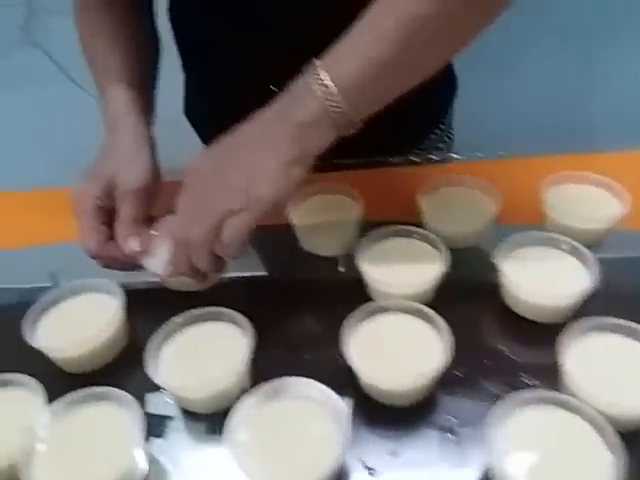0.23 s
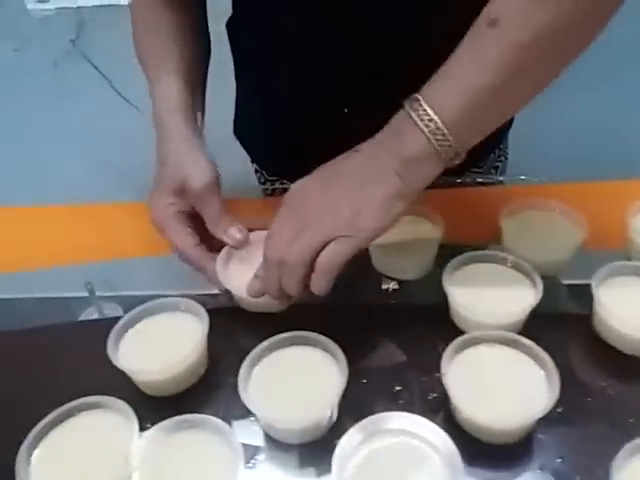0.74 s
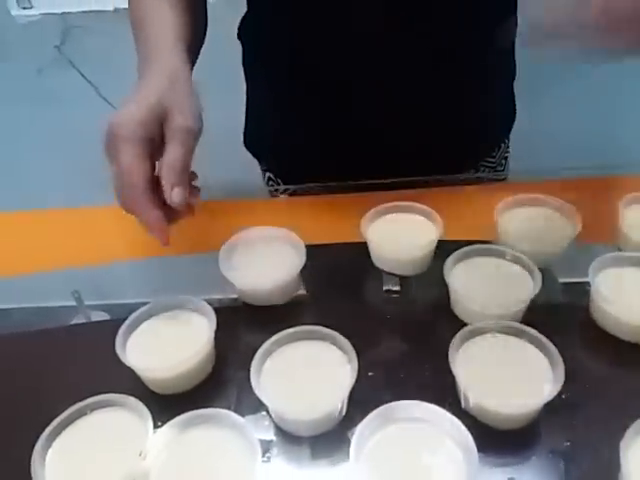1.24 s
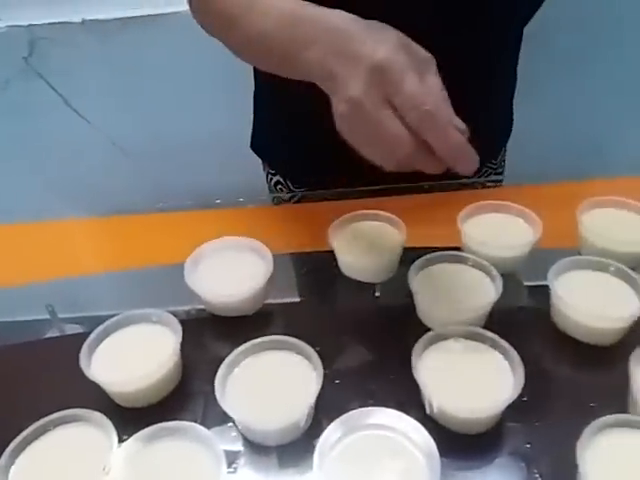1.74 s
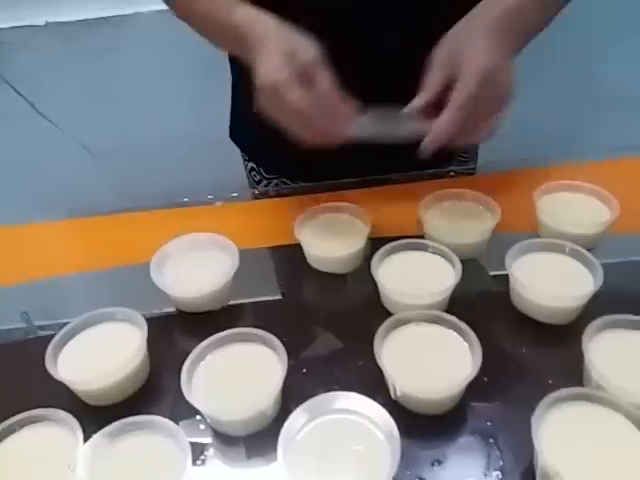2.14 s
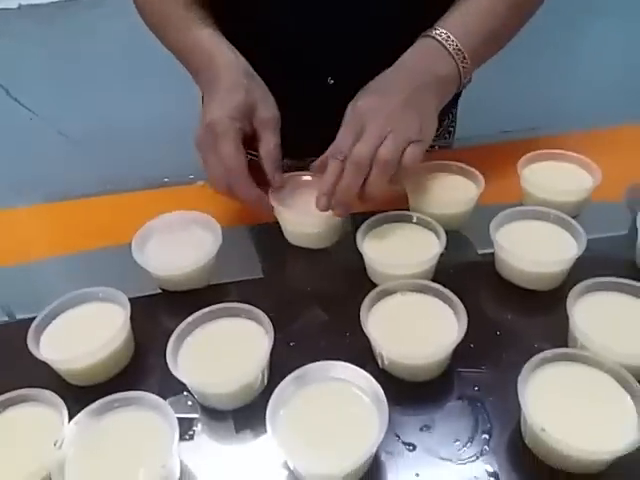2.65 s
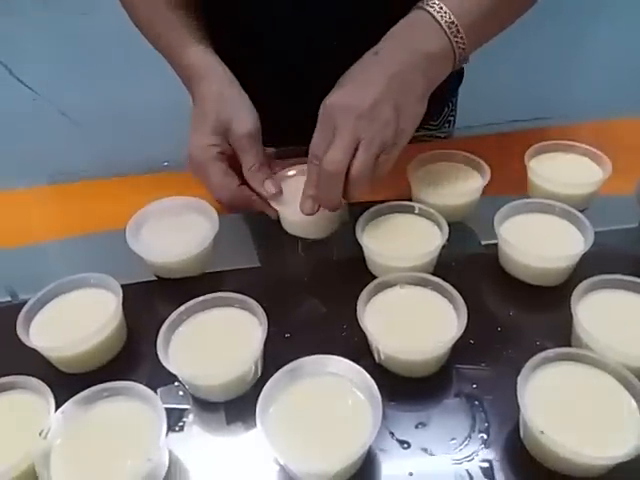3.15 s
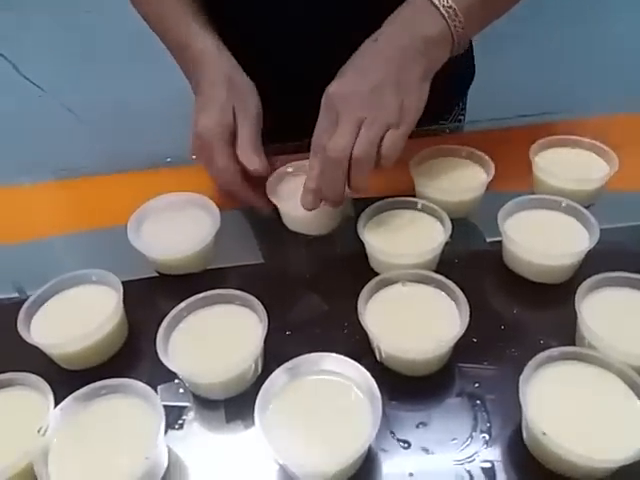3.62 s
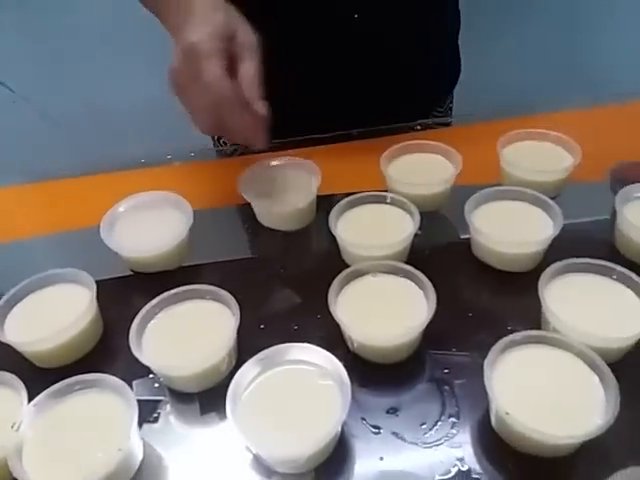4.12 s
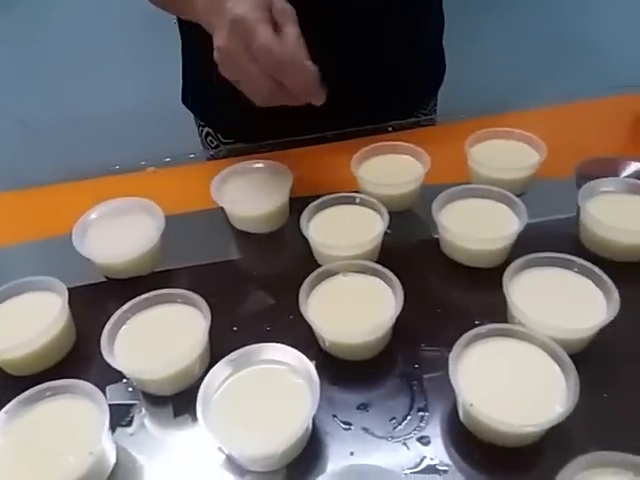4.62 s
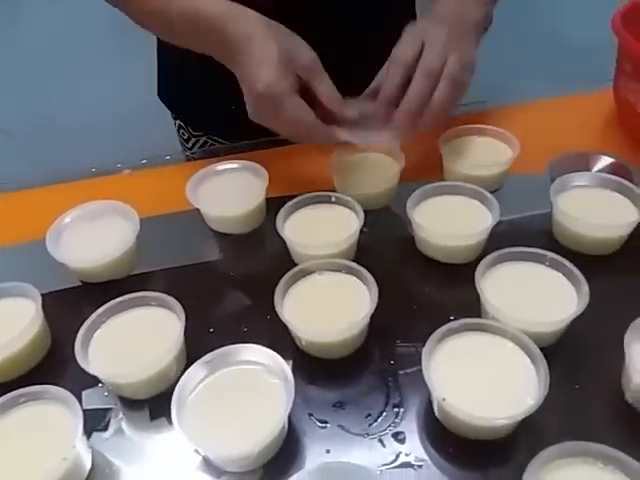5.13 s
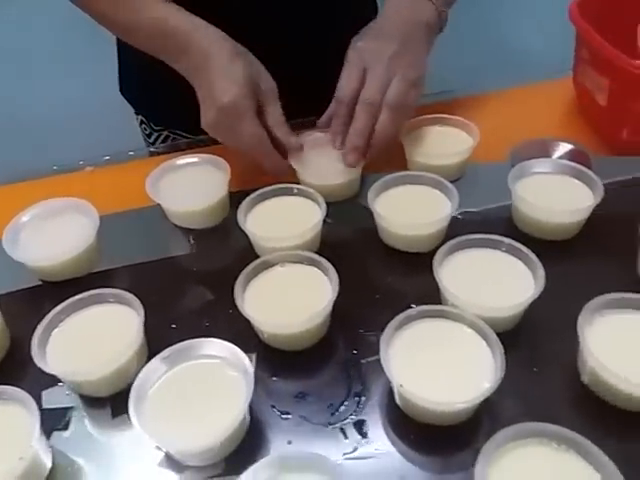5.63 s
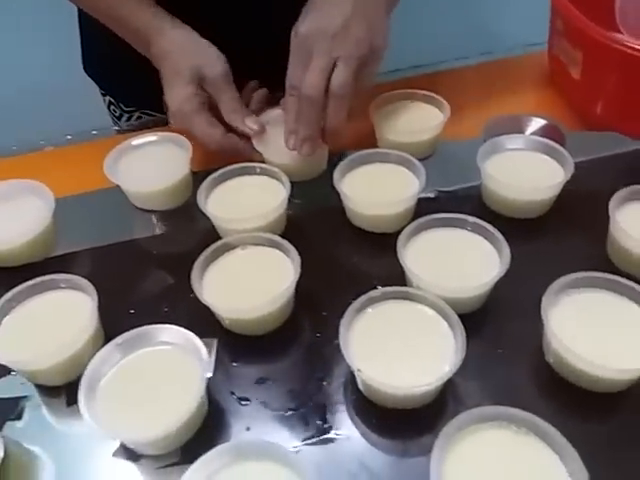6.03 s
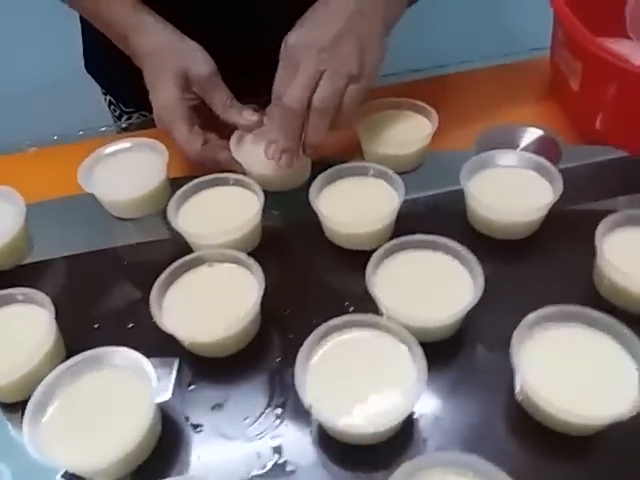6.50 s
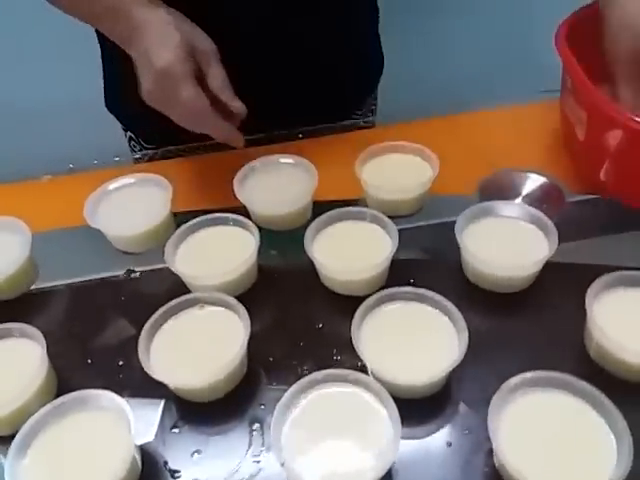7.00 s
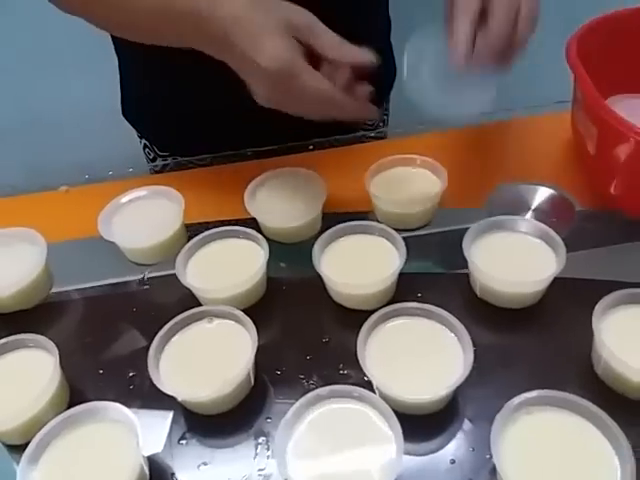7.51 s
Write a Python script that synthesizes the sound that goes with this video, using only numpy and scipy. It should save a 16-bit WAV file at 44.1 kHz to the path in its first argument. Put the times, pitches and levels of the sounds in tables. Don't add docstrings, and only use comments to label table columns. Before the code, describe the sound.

Sharp, short clicks of plastic lids seating on full cups ring with a roomy tail. Sparse snaps and tiny fingertip ticks alternate with knocking, rustling handfuls of loose lids. Late on, small presses lead to the loudest sound, a brief crackling crunch, then a snap and a brighter basket scrape with knocks. Soft house rumble and motor hum stay steady, heard through a muffled small microphone with little treble.

```python
import sys
import numpy as np
from scipy import signal
from scipy.fft import rfft, irfft
from scipy.io import wavfile

SR = 44100
rng = np.random.default_rng(int(sys.argv[2]) if len(sys.argv) > 2 else 0)


def decibels_to_gain(level_db):
    exponent = np.asarray(level_db, float) / 20
    return 10 ** exponent


def int16_out(signal):
    q = np.round(np.clip(np.atleast_2d(signal).T, -1, 1) * 32767)
    wavfile.write(sys.argv[1], SR, q.astype(np.int16))


N = 342118


def rms_one(x):
    return x / np.sqrt(np.mean(x ** 2) + 1e-20)


def peak_one(x):
    return x / np.abs(x).max()


def at_hz(points, hz):
    log_hz = np.log(np.array(points)[:, 0])
    return np.interp(np.log(hz + 1), log_hz, np.array(points)[:, 1])


def convolve(x, response):
    return signal.fftconvolve(x, response)[:len(x)]


def colour(x, points):
    size = 8192
    hz = np.arange(size // 2 + 1) * SR / size
    cepstrum = irfft(np.log(decibels_to_gain(at_hz(points, hz))))
    cepstrum[1:size // 2] *= 2
    cepstrum[size // 2 + 1:] = 0
    return convolve(x, irfft(np.exp(rfft(cepstrum))))


def drift(rate_hz):
    knot_hz = 40
    knots = rng.standard_normal(int(N / SR * knot_hz) + 2)
    r = np.exp(-2 * np.pi * rate_hz / knot_hz)
    slow = rms_one(signal.lfilter([1], [1, -r], knots))
    return np.interp(np.arange(N) / SR * knot_hz, np.arange(len(knots)), slow)


def ring(clicks, hz, t60_s):
    r, w = decibels_to_gain(-60 / (t60_s * SR)), 2 * np.pi * hz / SR
    return signal.lfilter([0, np.sin(w)], [1, -2 * r * np.cos(w), r * r], clicks + 1e-18)


def band(x, low_hz, high_hz):
    return signal.sosfilt(signal.butter(2, [low_hz, high_hz], "band", fs=SR, output="sos"), x)


def narrow_noise(hz, width_hz):
    noise = rng.standard_normal(N + SR)
    return rms_one(band(noise, hz - width_hz / 2, hz + width_hz / 2)[SR:])


# start_s [s], peak_db [dB], ring_hz [Hz], cup_db, crack_db [dB re peak]
SEATINGS = [(0.018, -24.5, 1420, -35, -41), (0.049, -10.5, 2360, -5, -20),
            (0.215, -12.5, 2040, -19.5, -32.5), (0.228, -15, 2670, -13.5, -27),
            (1.12, -17, 2310, -21, -25.5), (3.221, -7.5, 2340, -14, -21.5), (3.224, -16.5, 2410, -7, -17.5),
            (3.321, -9.5, 2430, -11.5, -9), (5.528, -20, 2000, -14, -36), (5.543, -25, 1610, -33, -33),
            (5.578, -31, 1680, -18, -29), (5.692, -26.5, 2280, -13, -33), (5.844, -30, 880, -19, -42),
            (5.859, -29.5, 920, -4, -34), (5.879, -33, 1980, -26, -22.5), (6.403, -27.5, 885, -5, -36),
            (6.769, -14.5, 2260, -10, -27)]
# start_s [s], peak_db [dB], ring_hz [Hz], crack_db [dB re peak], room_db [dB]
CRUNCH = [
    (6.414, -22, 2340, -22, -9),
    (6.419, -7, 2570, -28, -4),
    (6.424, -6, 2700, -24, 11),
    (6.435, -0.5, 1447, -20, -2),
    (6.45, -6, 1420, -26, -10),
    (6.465, -12.5, 1580, -17.5, 11),
    (6.485, -9, 1400, -33, -2.5),
    (6.528, -15, 2280, -24, -18),
]
# start_s [s], peak_db [dB],
# ring_hz [Hz], crack_db [dB re peak]
TICKS = [(0.748, -39, 2430, -29), (2.174, -36.5, 2450, -24.5), (2.471, -31.5, 2230, -32),
         (2.485, -29, 2250, -41), (2.918, -35, 2070, -32), (2.926, -33.5, 2320, -46),
         (2.934, -28.5, 2250, -30.5), (3.694, -33.5, 2420, -26.5), (3.764, -31.5, 2460, -32),
         (3.782, -37, 1760, -21), (5.373, -33, 2520, -34), (5.382, -29.5, 2500, -28),
         (5.503, -30, 2505, -43), (5.867, -26, 900, -18), (5.969, -27.5, 2500, -31),
         (6.249, -36.5, 2206, -28), (6.395, -34, 920, -37), (6.91, -48, 2310, -8), (6.919, -45, 1034, -22),
         (6.925, -39, 2000, -31)]
# start_s [s], peak_db [dB], crack_db [dB re peak], room_db [dB]
KNOCKS = [(1.695, -34, -25, -2), (1.708, -33, -27, 12), (1.778, -30, -28, 6.5), (4.235, -40.5, -26, 16),
          (4.263, -12.5, -26.5, 6), (4.307, -19, -18, 10), (4.475, -22.5, -23, 14.5), (4.495, -34, -32, 5),
          (4.503, -14.5, -21, -1.5), (4.593, -26, -16.5, 2.5), (4.677, -17, -13.5, 0.5),
          (4.69, -18.5, -38, 7.5), (4.701, -27, -38, 0), (4.814, -31.5, -12.5, 0), (4.86, -25, -24, 6.5),
          (4.932, -32.5, -23.5, 5), (5.03, -39, -37, 12), (7.142, -29.5, -22, 18),
          (7.151, -24.5, -32, 15.5), (7.167, -12.5, -23.5, 4.5), (7.181, -13.5, -21.5, -6),
          (7.185, -24, -26, -5), (7.191, -11.5, -29, 6), (7.202, -12, -31, -5), (7.236, -19.5, -31, 6),
          (7.322, -18.5, -25, 5.5), (7.344, -27, -15, 5), (7.381, -24.5, -18, 9), (7.459, -24.5, -16.5, 3),
          (7.481, -28, -21, -8)]
SEATING_ROOM_DB, TICK_ROOM_DB = 2.5, -1.5
CRUNCH_CUP_DB, TICK_CUP_DB, KNOCK_CUP_DB = -21.5, -20.5, -15.5


def contacts():
    seated = [(s, db, hz, cup, crack, SEATING_ROOM_DB, 0) for s, db, hz, cup, crack in SEATINGS]
    crunch = [(s, db, hz, CRUNCH_CUP_DB, crack, room, 0) for s, db, hz, crack, room in CRUNCH]
    ticks = [(s, db, hz, TICK_CUP_DB, crack, TICK_ROOM_DB, 0) for s, db, hz, crack in TICKS]
    starts, pitches = np.transpose(STROKES)[[0, 4]]
    knocks = [(s, db, pitches[np.searchsorted(starts, s) - 1], KNOCK_CUP_DB, crack, room, 1)
              for s, db, crack, room in KNOCKS]
    return seated + crunch + ticks + knocks


# pitch_hz [Hz], level_db [dB], t60_s [s]
CUP = [(204, -1.5, 0.016), (352, -4.5, 0.032), (592, -4.5, 0.032), (806, 1, 0.011), (1181, -2.5, 0.028),
       (1650, -3, 0.015)]
BASKET_HZ, BASKET_T60_S, BASKET_DB = 557, 0.067, -20.5


def cup_body(flurry, click, cup_db, loose):
    body = 0
    for k, (hz, db, t60_s) in enumerate(CUP):
        level_db = db + 3.4 * (rng.random() - .5)
        pitch_hz = hz * (1 + 0.29 * (rng.random() - .5))
        body = body + (-1) ** k * decibels_to_gain(level_db) * ring(flurry, pitch_hz, t60_s)
    cup = decibels_to_gain(cup_db + 4.5) * peak_one(band(body, 85, 3450))
    return cup + loose * decibels_to_gain(BASKET_DB) * ring(click, BASKET_HZ, BASKET_T60_S)


# pitch_hz [Hz], level_db [dB], t60_s [s]
BEAD = [(6000, -16.5, 0.0058), (7900, -3.5, 0.0045)]


def snaps():
    direct, send = np.zeros(N + 4096), np.zeros(N + 4096)
    t = np.arange(2048) / SR
    click = 1. * (t == 0)
    broad = peak_one(band(click, 1070, 2920))
    for start_s, peak_db, ring_hz, cup_db, crack_db, room_db, loose in contacts():
        height, chance, grain = rng.random((3, len(t)))
        flurry = click + (height - .5) * (chance < .1) * np.exp(-t / 0.0083) * 0.34
        rim = peak_one(band(ring(flurry, ring_hz, (20 + 22 * loose) / ring_hz), 440, 3400))
        rim = peak_one(rim + 0.07 * broad)
        cup = cup_body(flurry, click, cup_db, loose)
        top_hz = np.clip(16000 * decibels_to_gain(0.21 * (peak_db + 6) - 3.34 * loose), 4800, 16000)
        bead = (1 - loose) * sum(decibels_to_gain(db) * ring(flurry, hz, t60_s) for hz, db, t60_s in BEAD)
        crack = peak_one(band(0.76 * click + (grain - .5) * np.exp(-t / 0.0038), 2800, top_hz)) + bead
        spread = peak_one(band(ring(click, ring_hz, (12.2 + 7 * loose) / ring_hz), 600, 3050))
        spread = spread * (1.3 - 0.15 * loose) + (.7 - 0.18 * loose) * broad
        flat = peak_one(band(click, 3470, top_hz)) + 0.33 * bead
        at = round(start_s * SR)
        direct[at:at + len(t)] += decibels_to_gain(peak_db) * (rim + cup + decibels_to_gain(crack_db + 28) * crack)
        send[at:at + len(t)] += decibels_to_gain(peak_db + room_db) * (spread + cup + decibels_to_gain(crack_db + 35.5) * flat)
    return direct[:N], send[:N]


# pitch_hz [Hz], level_db [dB], t60_s [s]
LID = [(547, -1, 0.017), (880, -7, 0.019), (1200, -4, 0.021), (1420, -10, 0.022), (1840, 15, 0.01),
       (1982, 3.5, 0.015), (2250, 2.5, 0.0072), (2820, -22, 0.0086), (3120, 23, 0.0031)]
# start_s [s], length_s [s], crackle_db [dB], hiss_db [dB], loudest pitch_hz [Hz]
STROKES = [
    (1.677, 0.31, -50, -53.5, 2600),
    (4.251, 0.24, -36.5, -45, 2540),
    (4.472, 0.21, -39.5, -41, 2540),
    (4.662, 0.12, -32, -41, 2140),
    (5.52, 0.054, -45.5, -57, 1940),
    (5.842, 0.084, -41, -47, 2170),
    (6.396, 0.22, -45, -31, 2140),
    (7.136, 0.14, -58, -27.5, 2250),
    (7.259, 0.16, -41, -41, 2170),
    (7.452, 0.12, -45.5, -64, 2170),
]
STROKE_ATTACK_S, STROKE_RELEASE_S = .02, 0.0091
CRACKLE_FADE_DB, HISS_FADE_DB = 6, 17


def rustle():
    sizes = decibels_to_gain(2.7 * np.minimum(rng.exponential(1, N), 4)) * rng.choice([-1, 1], N)
    slips_per_s = 600 * decibels_to_gain(5 * drift(12))
    slips = rms_one(sizes * (rng.random(N) < slips_per_s / SR))
    dealt = rng.integers(0, len(LID), N)
    t = np.arange(N) / SR
    crackle, hiss, pitch_hz = np.zeros(N), np.zeros(N), np.ones(N)
    for start_s, length_s, crackle_db, hiss_db, hz in STROKES:
        done = np.clip((t - start_s) / length_s, 0, 1)
        rise = (t - start_s) / STROKE_ATTACK_S
        fall = (start_s + length_s - t) / STROKE_RELEASE_S
        edge = np.clip(np.minimum(rise, fall), 0, 1)
        crackle += edge * decibels_to_gain(crackle_db - CRACKLE_FADE_DB * done)
        hiss += edge * decibels_to_gain(hiss_db - HISS_FADE_DB * done)
        pitch_hz[t >= start_s] = hz
    body = np.zeros(N)
    for k, (hz, db, t60_s) in enumerate(LID):
        nearness = decibels_to_gain(-np.minimum(55 * np.abs(np.log2(hz / pitch_hz)), 19))
        body += decibels_to_gain(db) * ring(slips * crackle * (dealt == k) * nearness, hz, t60_s)
    return decibels_to_gain(-6.0) * band(body, 330, 4800) + decibels_to_gain(14.0) * band(slips * hiss, 1700, 7600)


# pitch_hz [Hz], t60_s [s]
ROOM_T60 = [(150, 0.67), (500, 0.63), (1200, 0.68), (2500, 0.59), (6000, 0.63), (12000, 0.54)]
# delay_s [s], level_db [dB]
WALLS = [(.0045, -13.5), (0.012, -24), (0.022, -19.5), (0.028, -28)]
ROOM_DB = -2


def kitchen(x):
    t = np.arange(SR) / SR
    density = np.clip(0.053 + (t / .05) ** 2, 0, 1)
    scatter = rng.standard_normal(SR) * (rng.random(SR) < density) / np.sqrt(density)
    edges = 60 * 2 ** np.arange(0, 8.6, .5)
    tail = np.zeros(SR)
    for low_hz, high_hz in zip(edges, edges[1:]):
        t60_s = at_hz(ROOM_T60, np.sqrt(low_hz * high_hz))
        tail += band(scatter, low_hz, high_hz) * decibels_to_gain(-60 * t / t60_s)
    tail *= np.clip((t - .006) / 0.0033, 0, 1)
    tail /= np.sqrt(np.sum(tail ** 2))
    for delay_s, db in WALLS:
        tail[round(delay_s * SR)] += decibels_to_gain(db)
    return convolve(x, tail)


# time_s [s], change_db [dB]
AMBIENCE = [(0, -1), (1, 0.5), (1.5, -0.5), (1.62, -4.5), (1.75, 0.5), (2.4, -2), (2.8, -2), (3.8, -0.5),
            (5.2, -0.5), (6.2, -0.5), (7, 0.5), (7.76, -1.5)]
# pitch_hz [Hz], level_db [dB per Hz]
HOUSE = [(30, 8.5), (70, -6.5), (130, -0.5), (300, -3.5), (480, -9.5), (900, -9), (1200, -12.5),
         (1450, -16), (2400, -13.5), (4000, -26.5), (9000, -53)]
# pitch_hz [Hz], level_db [dB]
HUM = [(99.9, -63.5), (199.8, -59), (299.7, -57.5)]
# pitch_hz [Hz], level_db [dB], width_hz [Hz]
DRONE = [(100.7, -56, 8.6), (131.3, -55.5, 10), (213, -60, 10.7), (251, -85, 10.2), (424.5, -62, 34.7)]
# start_s [s], end_s [s], pitch_hz [Hz], level_db [dB]
FAR_WHINE = [
    (0.448, 1.096, 1250, -61.5),
    (1.994, 2.4, 898, -61.5),
    (4.08, 4.274, 1680, -54),
    (6.142, 6.41, 1712, -57.5),
]
# start_s [s], pitch_hz [Hz], level_db [dB]
THUMPS = [
    (0.393, 127, -30.5),
    (3.224, 70, -31),
    (6.43, 60, -35),
]
HOUSE_DB = -44.5


def house():
    t = np.arange(N) / SR
    rumble = rms_one(colour(rng.standard_normal(N + SR), HOUSE)[SR:])
    out = decibels_to_gain(HOUSE_DB + 1.46 * drift(1.9)) * rumble
    for hz, db in HUM:
        out += decibels_to_gain(db + 2.0 + 4.4 * drift(3.8)) * np.sin(2 * np.pi * hz * t)
    for hz, db, width_hz in DRONE:
        out += decibels_to_gain(db + 1.4 * drift(2.0)) * narrow_noise(hz, width_hz)
    for start_s, end_s, hz, db in FAR_WHINE:
        edge = np.clip(np.minimum(t - start_s, end_s - t) / 0.034, 0, 1)
        out += decibels_to_gain(db) * edge * narrow_noise(hz, 59)
    for start_s, hz, db in THUMPS:
        since = np.maximum(t - start_s, 0)
        out += decibels_to_gain(db) * np.sin(2 * np.pi * hz * since) * np.exp(-since / 0.012)
    time_s, change_db = np.transpose(AMBIENCE)
    return out * decibels_to_gain(np.interp(t, time_s, change_db))


def scene():
    direct, send = snaps()
    rubbing = rustle()
    echo = decibels_to_gain(ROOM_DB) * kitchen(send + decibels_to_gain(4.0) * rubbing)
    return (direct + rubbing + echo + house())[None]


def band_limit(x):
    return signal.sosfilt(signal.butter(12, 16600, fs=SR, output="sos"), x)


# pitch_hz [Hz], level_db [dB]
MIC = [(25, -66), (45, -13), (85, -3.5), (1200, -2), (2000, -1), (2450, 1.5), (2900, -6.5), (3500, -13.5),
       (4600, -22.5), (6000, -24), (7600, -29), (8500, -30), (12000, -38), (16000, -39)]
HISS_DB = -69.5


def record(dry):
    hiss = decibels_to_gain(HISS_DB) * band(rng.standard_normal(N), 4100, 22000)
    heard = 1.353 * np.tanh((colour(dry[0], MIC) + hiss) / 1.232)
    heard = signal.sosfilt(signal.cheby2(10, 50, 16900, fs=SR, output="sos"), heard)
    return band_limit(heard[None])


dry = scene()
out = record(dry)
int16_out(out)
```